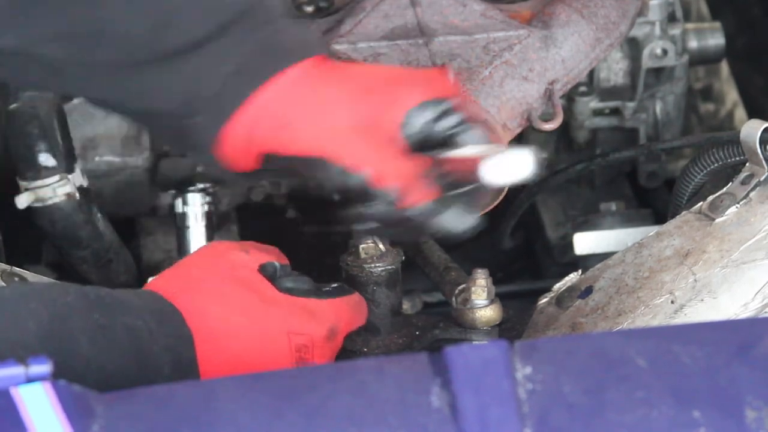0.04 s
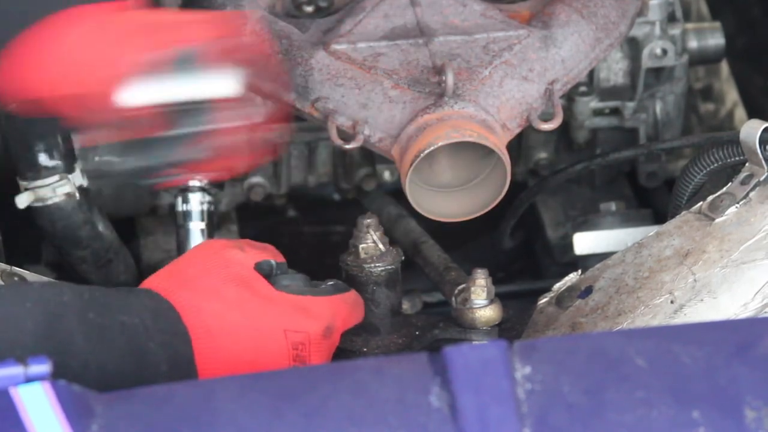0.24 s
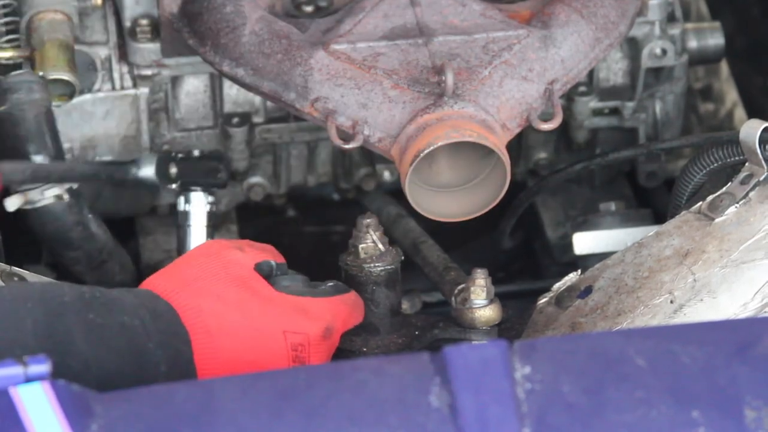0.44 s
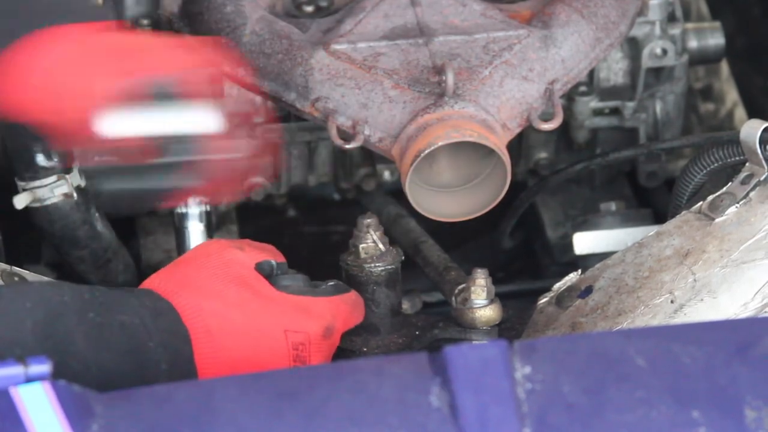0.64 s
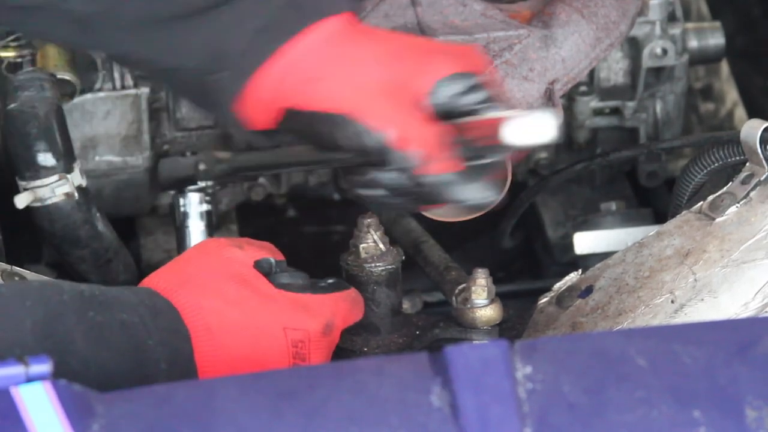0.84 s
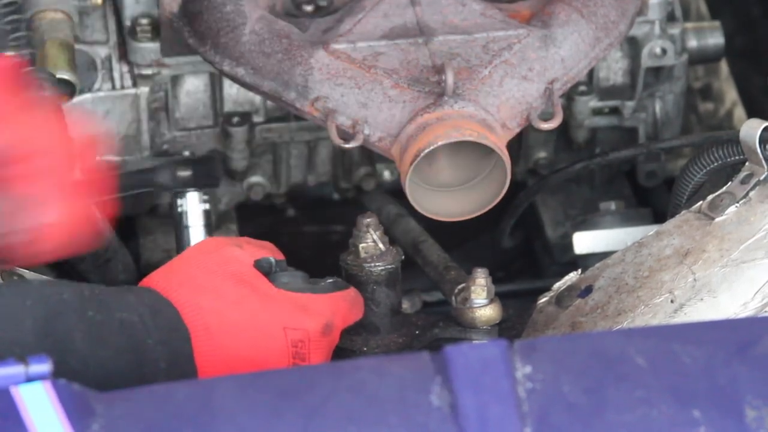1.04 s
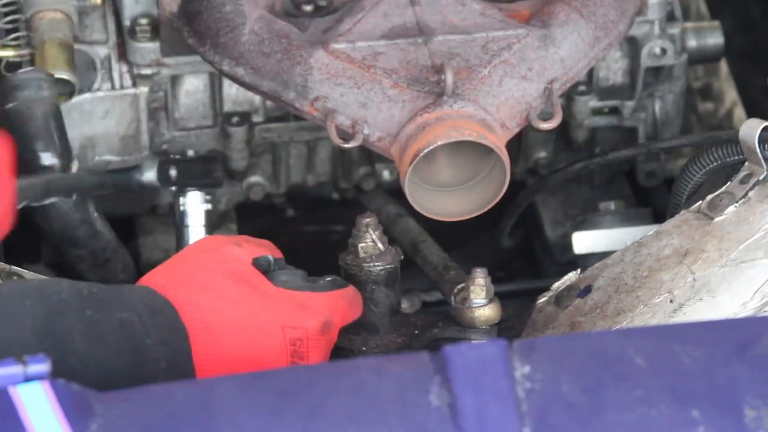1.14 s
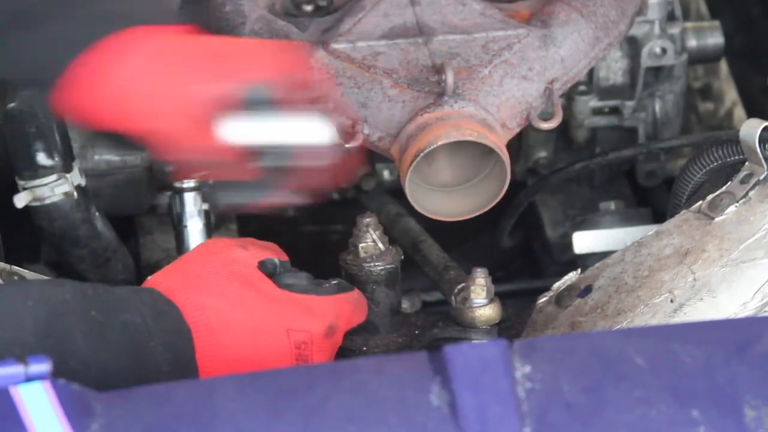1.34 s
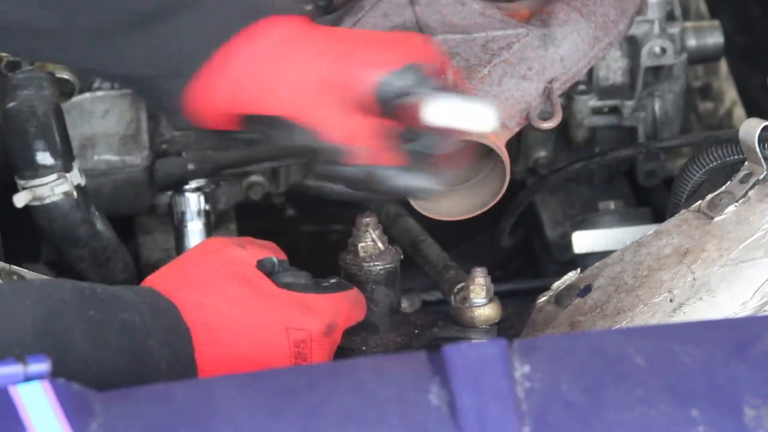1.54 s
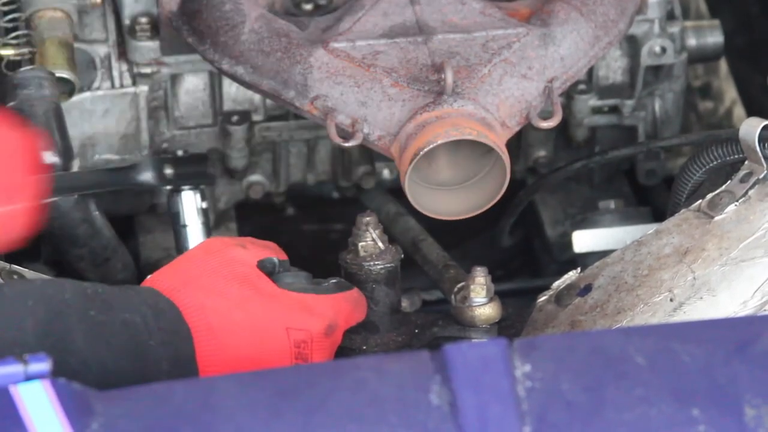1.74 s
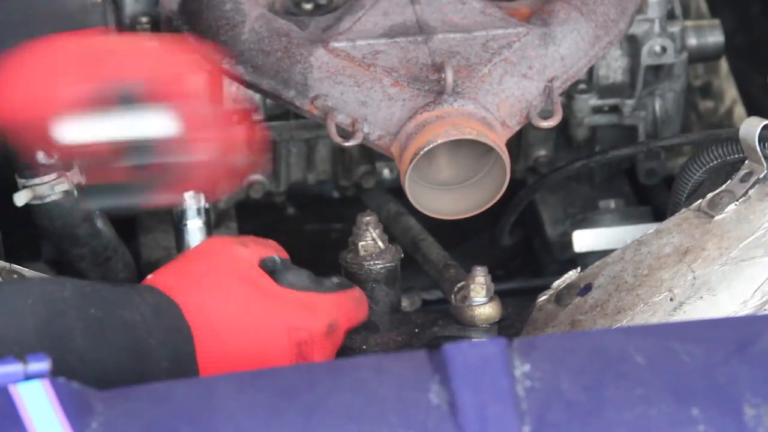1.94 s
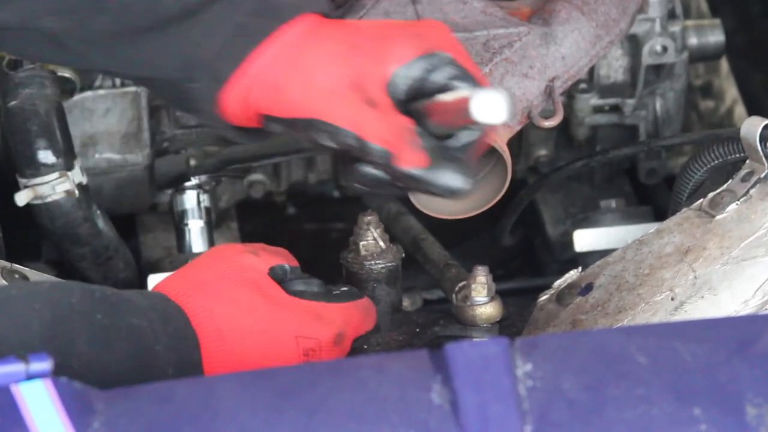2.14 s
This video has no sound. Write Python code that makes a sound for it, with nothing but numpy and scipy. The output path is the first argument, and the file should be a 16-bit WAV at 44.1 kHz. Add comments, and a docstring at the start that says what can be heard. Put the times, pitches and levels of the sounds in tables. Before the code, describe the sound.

A socket ratchet is swung three times on an engine nut, each swing giving soft taps, quick clicks and a ringing knock. One bright steel clank falls between the first two. Close microphone in an echoing garage with steady background noise.

```python
"""First come soft, dull taps over steady workshop noise: a socket ratchet shifting on a nut in an engine bay.
It is swung three times, close to a single microphone in a garage. On each back swing the pawl ticks
over its teeth, then the tool takes up its slack with a knock that rings the engine parts.
Between the first two swings comes one bright steel clank. The hard walls echo behind the tool."""
import sys
import numpy as np
from scipy import signal
from scipy.fft import irfft
from scipy.io import wavfile

SR = 44100
rng = np.random.default_rng(int(sys.argv[2]) if len(sys.argv) > 2 else 0)


def output_pcm(signal):
    """Save a mono or channel-first signal as 16-bit PCM at the path in sys.argv[1].

    Samples are clipped to [-1, 1] before scaling.
    """
    pcm = np.clip(np.atleast_2d(signal).T, -1, 1) * 32767
    wavfile.write(sys.argv[1], SR, np.round(pcm).astype(np.int16))


N = 97020
T = np.arange(N) / SR
SHORT = 8192  # samples in one brief sound


def undb(db):
    """Decibels to gain."""
    return 10 ** (np.asarray(db) / 20)


def along(points, hz):
    """Read a table on a log-frequency axis."""
    freqs, values = np.array(points, float).T
    return np.interp(np.log(np.maximum(hz, 1)), np.log(freqs), values)


def noise(colour, size=SHORT):
    """Noise of a given colour, rms 1."""
    f = np.fft.rfftfreq(size, 1 / SR)
    x = irfft(np.exp(2j * np.pi * rng.random(len(f))) * undb(along(colour, f)), size)
    return x / x.std()


def narrow(hz, width_hz, size=SHORT):
    """Noise in one resonance with no bass under it, rms 1."""
    f = np.fft.rfftfreq(size, 1 / SR)
    resonance = np.minimum(f / hz, 1) ** 2 / (1 + (2 * (f - hz) / width_hz) ** 2)
    x = irfft(np.exp(2j * np.pi * rng.random(len(f))) * resonance, size)
    return x / x.std()


def fade(rise_s, hold_s, t60_s, size=SHORT):
    """Linear attack, with an exponential release from hold_s on."""
    t = T[:size]
    return np.minimum(t / rise_s, 1) * np.exp(-np.log(1000) * np.maximum(t - hold_s, 0) / t60_s)


def ring(modes, size=SHORT):
    """Decaying modes struck together."""
    t = T[:size]
    return sum(undb(db) * np.sin(2 * np.pi * (hz * t + rng.random())) * np.exp(-np.log(1000) * t / t60)
               for hz, db, t60 in modes)


# the workshop's room tone, all around the microphone (frequency [Hz], relative level [dB])
ROOM_TONE_COLOUR = [(18, -54), (30, -9.5), (71, -2.5), (115, -10.5), (153, -8.5), (512, -2), (584, -3),
                    (666, -5), (844, -1.5), (913, -5.5), (2680, -12.5), (3400, -14.5), (6050, -28.5),
                    (13300, -36.5), (16000, -39.5)]


def room_tone():
    """Steady workshop noise with a thin, high hiss."""
    return undb(-38) * noise(ROOM_TONE_COLOUR, N) + undb(-58) * narrow(hz=13100, width_hz=1200, size=N)


# handle and socket tapping, close to the microphone (time [s], level [dB])
HANDLE_TAPS = [(.093, -26.5), (.2, -31.5), (.229, -29.5), (0.2804, -22), (0.341, -24), (.868, -32),
               (.951, -30.5), (.988, -27.5), (1.062, -22.5), (1.5, -27.5), (1.597, -31.5), (1.632, -30),
               (1.658, -26), (1.708, -22.5), (1.922, -24)]
# spectrum of a tap (frequency [Hz], relative level [dB])
TAP_SPECTRUM = [(80, -44), (250, -1), (500, -1), (850, 3.5), (2000, -2), (4000, -13.5), (8000, -22),
                (16000, -52)]


def taps():
    """The loose socket and handle shift with soft, dull taps."""
    out = np.zeros(N)
    for at, db in HANDLE_TAPS:
        add(out, at, undb(db) * noise(TAP_SPECTRUM) * fade(0.0036, 0.0081, 0.078))
    return out


# the garage walls, heard from beside the engine bay (frequency [Hz], relative level [dB])
GARAGE_COLOUR = [(60, 3), (250, 7), (700, 1), (2000, -0.5), (4500, -6), (8000, -9.5), (12000, -10),
                 (16000, -14)]
# decay of the garage (frequency [Hz], t60 [s])
GARAGE_T60 = [(100, 1.4), (300, 0.97), (1000, 1.44), (2500, 1.054), (5000, 1.11), (9000, 0.49),
              (15000, 0.38)]


def garage(sound):
    """Dense echoes off hard walls; the treble dies first."""
    f = np.fft.rfftfreq(N, 1 / SR)
    spectrum = np.exp(2j * np.pi * rng.random(len(f))) * undb(along(GARAGE_COLOUR, f))
    centres = np.geomspace(100, 15000, 9)
    tail = np.zeros(N)
    for hz, weights in zip(centres, np.eye(len(centres))):
        band = irfft(spectrum * np.interp(f, centres, weights), N)
        tail += band * np.exp(-np.log(1000) * T / along(GARAGE_T60, hz))
    onset = np.minimum(T / 0.0067, 1)
    late_drop = undb(-4.5 * np.clip((T - 0.19) / 0.04, 0, 1))  # early echoes end, a weaker tail remains
    return 5.61 * signal.fftconvolve(sound, tail * onset * late_drop)[:N]


# the pawl dropping over each tooth, close up (time [s], level [dB], brightness [dB/octave],
# relative scrape level [dB], ring frequency [Hz], relative ring level [dB])
PAWL_TICKS = [(.229, -21.5, 0.5, -14, 11650, -1), (0.283, -20.5, -4, -9, 11400, -2),
              (0.294, -35, 1, -15, 13500, -10), (0.3248, -26.5, -2, -18, 5200, -13),
              (0.341, -20.5, 1.5, -18, 8100, -13), (0.953, -32.5, -6, -6, 8760, -16),
              (0.9885, -22.5, 2, -13, 8750, -10), (1.026, -25.5, 1.5, -6, 9050, -11),
              (1.062, -21.5, -3, -23, 8750, -15), (1.593, -38.5, -9, -8, 5030, -22),
              (1.632, -27, -2.5, -10, 4950, -1), (1.6612, -25, -0.5, -5, 13300, -10),
              (1.7108, -18.5, 1, -7, 8200, -9), (1.731, -22, 4.5, -9, 9700, -2.5),
              (1.8602, -24, 1, -31, 7940, -9), (1.9176, -33, -5, -14, 10100, -12)]
# spectrum of a tick (frequency [Hz], relative level [dB])
PAWL_COLOUR = [(150, -52), (700, -5), (1800, 1), (3500, 2), (5000, 2.5), (6300, -0.5), (8500, 2),
               (12000, -6), (16000, -6)]
# modes of the ratchet head (frequency [Hz], relative level [dB], t60 [s])
RATCHET_MODES = [(3555, -3, .04), (4900, -2.5, 0.047), (8330, -7.5, 0.049), (8890, -6, 0.041),
                 (9440, -13, .04), (11750, -4, 0.061), (13500, -6, .035), (15000, -13, 0.028)]
BAY_ECHO_S, SCRAPE_S = 0.0045, 0.0095


def pawl():
    """The pawl scrapes up a tooth and snaps down, ringing the head; the engine bay echoes the snap."""
    out = np.zeros(N)
    for at, db, tilt_db, scrape_db, ring_hz, ring_db in PAWL_TICKS:
        colour = [(hz, level + tilt_db * np.log2(hz / 6000)) for hz, level in PAWL_COLOUR]
        scrape = noise(colour) * fade(SCRAPE_S, SCRAPE_S, 0.0053)
        add(out, at - SCRAPE_S, undb(db + scrape_db) * scrape)
        for lag, path_db in ((0, 0), (BAY_ECHO_S, -8)):
            snap = noise(colour) * fade(0.00042, 0.00069, 0.046)
            add(out, at + lag, undb(db + path_db) * snap)
        # each tick strikes the modes a little differently
        modes = [(hz, level + rng.normal(-9, 3), t60) for hz, level, t60 in RATCHET_MODES]
        add(out, at, undb(db) * ring(modes + [(ring_hz, ring_db, 0.035)]))
    return out


# slack taken up at the nut, down in the engine bay (time [s], body level [dB], crack level [dB],
# relative engine ring [dB], ring tilt [dB/octave], thump [Hz], thump level [dB], body centre [Hz])
SLACK_KNOCKS = [(0.3687, -9.5, -14.5, -23, 0, 251, -11, 714), (1.0742, -9, -12, -18.5, -4, 332, -9, 1710),
                (1.7522, -12, -18, -23, -1.5, 331.4, -11.5, 1560)]
# spectra of a knock's body and of a hard steel crack (frequency [Hz], relative level [dB])
BODY_SPECTRUM = [(40, -40), (110, -21), (200, -4), (350, -4), (520, -18.5), (750, 1.5), (1000, 0.5),
                 (1400, -3), (1900, -.5), (3000, -3), (5000, -14.5), (9000, -18.5), (16000, -49)]
CRACK_SPECTRUM = [(60, -57), (300, -62), (1500, -1.5), (3000, -5.5), (4700, 4.5), (6000, -2.5), (8000, -2),
                  (11000, -7), (16000, -6.5)]
# modes of the engine parts around the nut (frequency [Hz], relative level [dB], t60 [s])
ENGINE_PART_MODES = [(150.6, -18, 0.43), (233.4, -6.5, 0.6), (290.4, -4, 0.81), (331.7, -4, 0.67),
                     (377.2, -2, 0.88), (394.8, 0, 0.88), (722, -18, 1), (750, 1, 0.84), (960, -39, 0.53),
                     (975, -27.5, .6), (1470, -39, .4), (1645, 2, 0.46), (1855, -7, 1), (1813, -10, .5)]
THUMP_LAG_S, BOOM_HZ = 0.00398, 74.3  # the boom is the garage's lowest resonance


def knocks():
    """The tool slams against its slack; the blow rings the engine parts and raises a faint boom."""
    blows, rings = np.zeros(N), np.zeros(N)
    boom = undb(-43.5) * np.sin(2 * np.pi * BOOM_HZ * T) * fade(0.08, 0.14, 0.5, N)
    for at, db, crack_db, ring_db, tilt_db, thump_hz, thump_db, centre_hz in SLACK_KNOCKS:
        body = noise(BODY_SPECTRUM) + undb(-8.5) * narrow(centre_hz, width_hz=430)
        add(blows, at, undb(db) * body * fade(0.00064, 0.0055, 0.058))
        add(blows, at, undb(crack_db) * noise(CRACK_SPECTRUM) * fade(0.00051, 0.0048, 0.03))
        add(blows, at + THUMP_LAG_S, undb(thump_db) * thump(thump_hz))
        modes = [(hz, level + tilt_db * np.log2(hz / 400), t60) for hz, level, t60 in ENGINE_PART_MODES]
        engine = ring(modes, size=SR) * np.minimum(T[:SR] / 0.011, 1)
        add(rings, at, undb(ring_db - 3.5) * engine)
        add(rings, at, boom)
    return blows, rings


def thump(hz):
    """A few heavily damped cycles of a massive part."""
    return np.sin(2 * np.pi * hz * T[:SHORT]) * fade(0.004, 0.004, 0.028)


# modes of the tool's steel, close to the microphone (frequency [Hz], relative level [dB], t60 [s])
CLANK_MODES = [(2250, 5, 0.0078), (2385, -16, 0.027), (2500, -10.5, .05), (2655, -14.5, 0.034),
               (3394, -19, 0.076), (4230, -17, 0.014), (4960, -23, 0.041), (5800, -16, 0.044),
               (5840, -16, 0.059), (5970, -15, .04), (10300, -23, .03), (10800, -18, 0.042)]
CLANK_S = 0.7577


def clank():
    """Steel strikes steel: a crack and short, bright modes, echoed by the bay, over a small thud."""
    out = np.zeros(N)
    for lag, path_db in ((0, 0), (BAY_ECHO_S, -9.5)):
        crack = undb(-5.5) * noise(CRACK_SPECTRUM) * fade(0.00056, 0.0006, 0.025)
        steel = undb(-1.5) * ring(CLANK_MODES)
        add(out, CLANK_S + lag, undb(path_db) * (crack + steel))
    add(out, CLANK_S + THUMP_LAG_S, undb(-22.5) * thump(hz=297))
    return out


# shimmer of the steel after the clank, close up (frequency [Hz], relative level [dB])
SHIMMER_SPECTRUM = [(500, -35), (2000, -12), (2600, 0.5), (3100, -12), (5200, -5), (5950, 9), (6600, -6),
                    (9300, -14), (10700, 7.5), (11800, -8), (13400, 0), (16000, -16)]
HANDLE_HZ, SHIMMER_T60_S = 695, 0.3


def after_ring():
    """After the clank the handle hums until the glove damps it, and many high modes shimmer on."""
    out = np.zeros(N)
    hum = np.sin(2 * np.pi * HANDLE_HZ * T) * fade(0.0027, 0.03, 0.051, N)
    add(out, CLANK_S, undb(-17) * hum)
    shimmer = noise(SHIMMER_SPECTRUM, N) * fade(0.0018, 0.0044, SHIMMER_T60_S, N)
    add(out, CLANK_S, undb(-32.5) * shimmer)
    modes = [(hz, along(SHIMMER_SPECTRUM, hz), SHIMMER_T60_S * np.sqrt(10000 / hz))
             for hz in rng.uniform(3200, 14500, size=48)]
    add(out, CLANK_S, undb(-43) * ring(modes, size=SR // 2))
    return out


def add(out, at_s, sound):
    """Mix a sound in at a time."""
    start = int(at_s * SR)
    out[start:start + len(sound)] += sound[:N - start]


def scene():
    """One microphone: the tool close by, the garage around it."""
    tapping, ticks = taps(), pawl()
    blows, rings = knocks()
    steel, ringing = clank(), after_ring()
    direct = tapping + ticks + blows + rings + steel + ringing
    echoes = garage(tapping + undb(2) * ticks + blows + undb(-6) * steel + undb(-9) * ringing)
    return (room_tone() + direct + echoes)[None]


def record(dry):
    """The hardest blows clip the recorder; the deepest bass and the top are cut."""
    low_cut = signal.butter(2, 40, "high", fs=SR, output="sos")
    high_cut = signal.ellip(10, 0.2, 80, 15900, fs=SR, output="sos")
    clipped = np.clip(dry, -1, 1)
    return signal.sosfilt(high_cut, signal.sosfilt(low_cut, clipped))


dry = scene()
out = record(dry)
output_pcm(out)
```